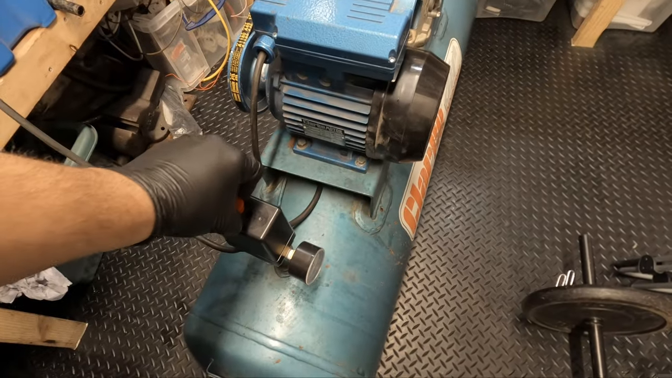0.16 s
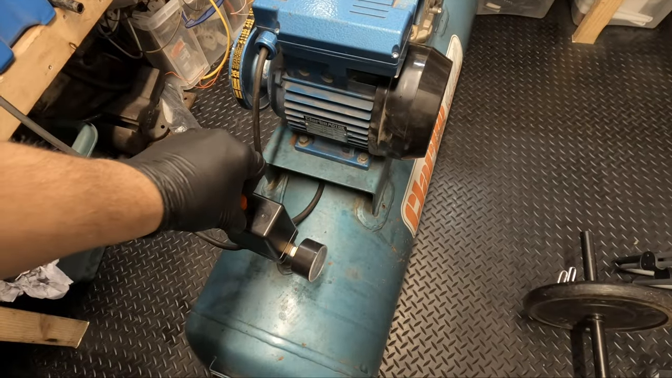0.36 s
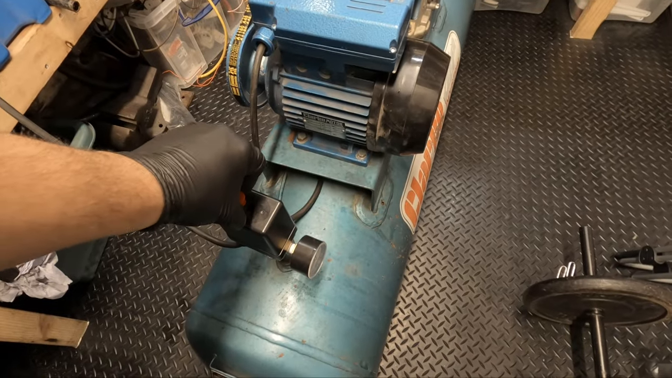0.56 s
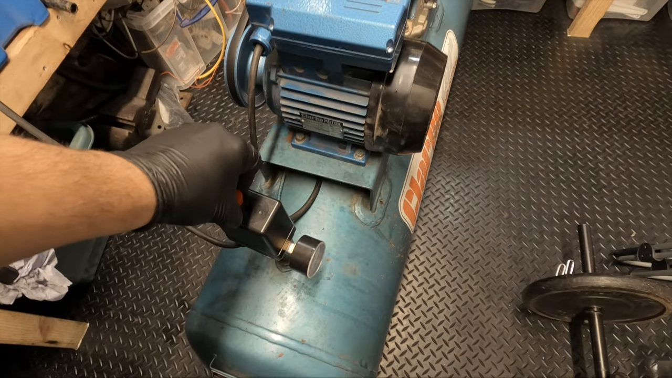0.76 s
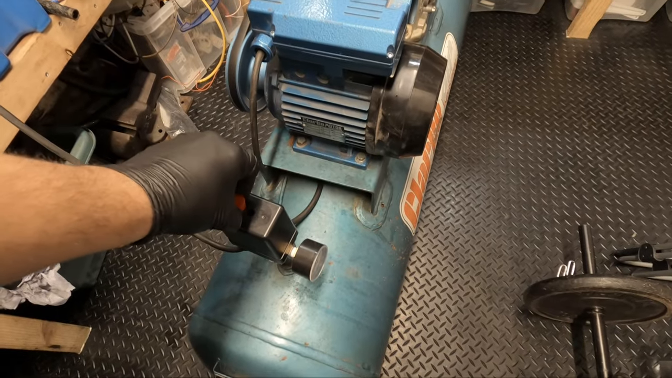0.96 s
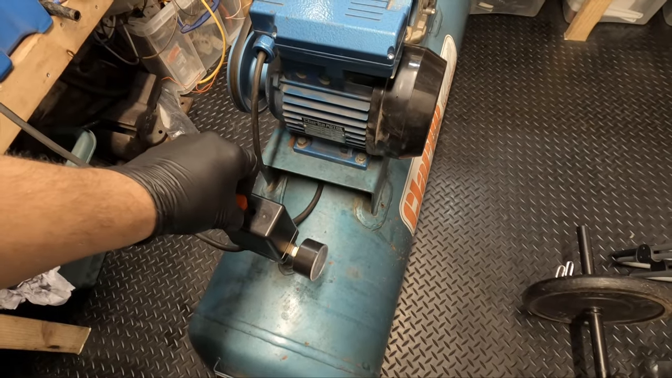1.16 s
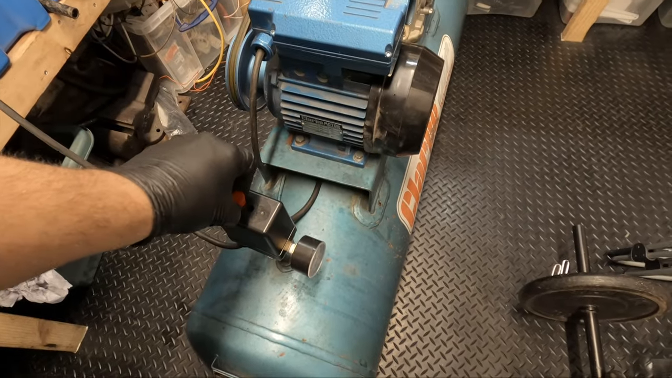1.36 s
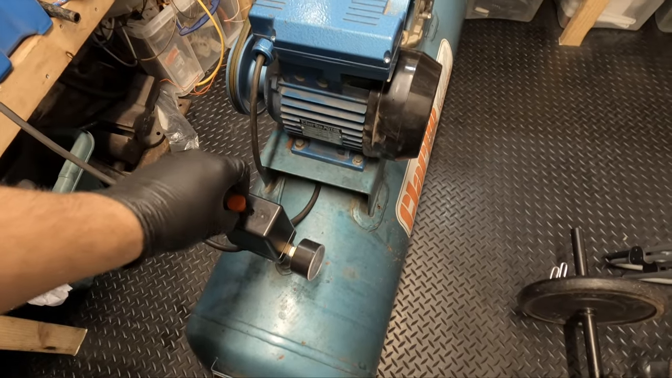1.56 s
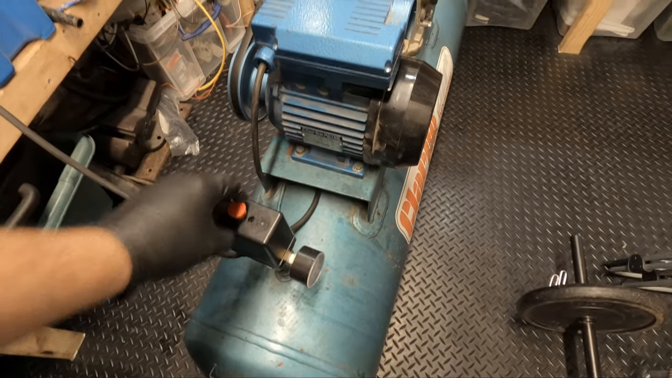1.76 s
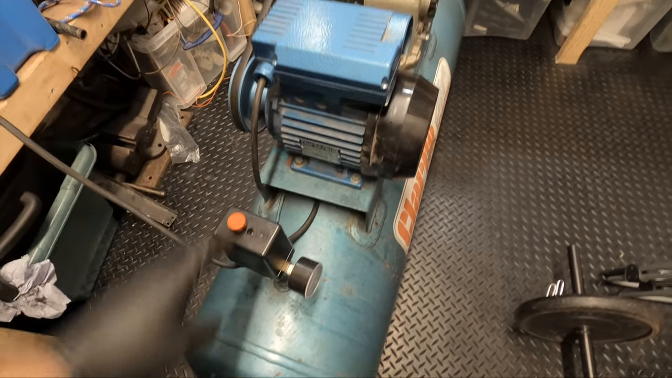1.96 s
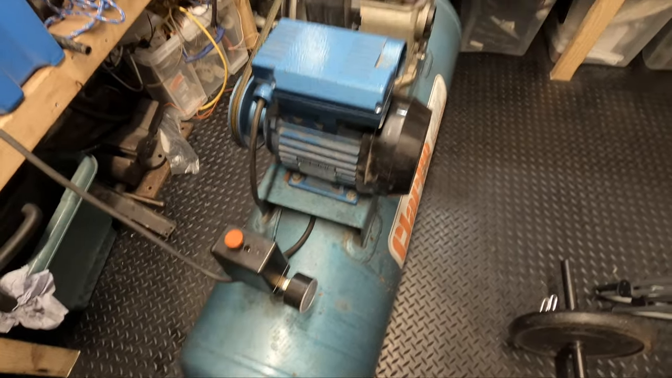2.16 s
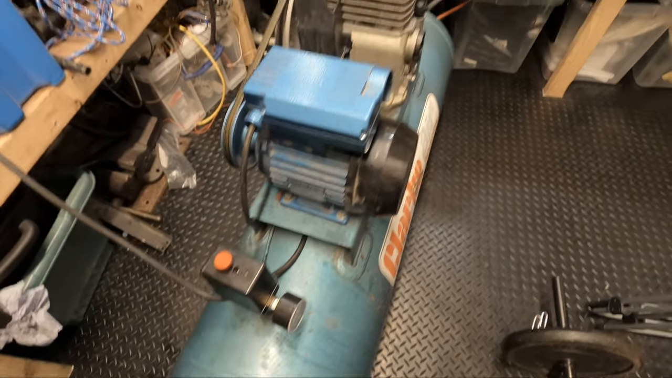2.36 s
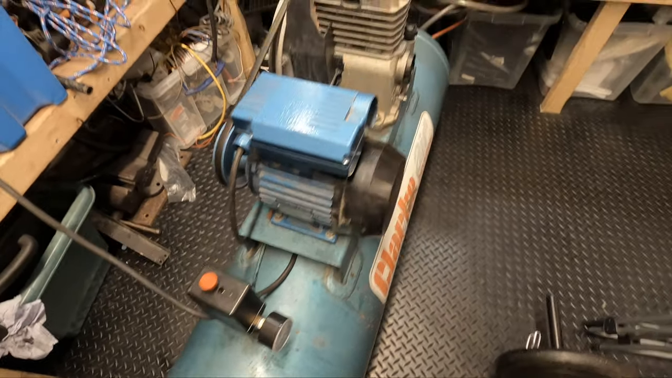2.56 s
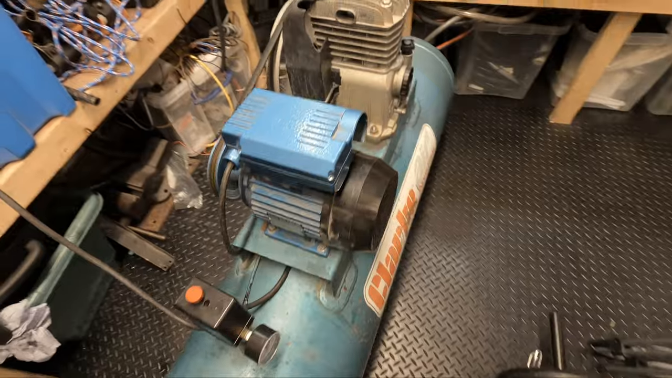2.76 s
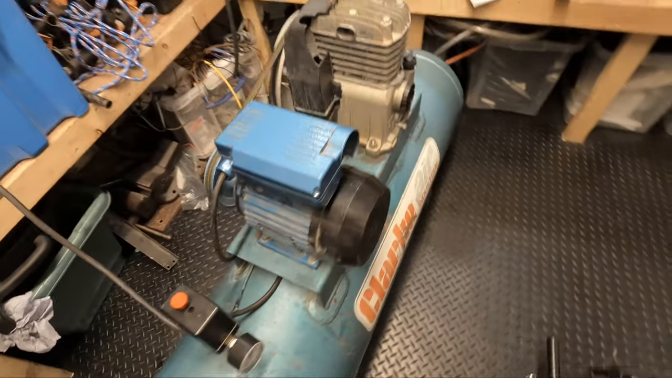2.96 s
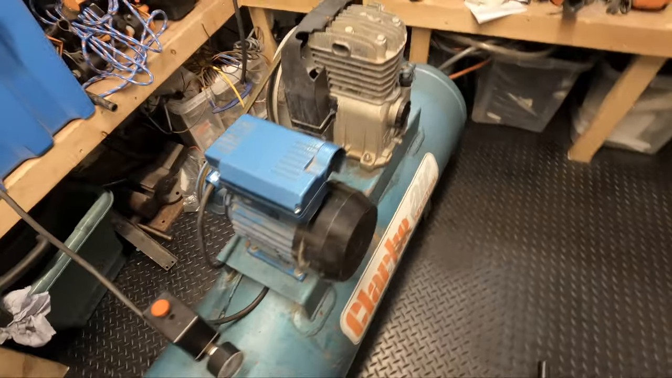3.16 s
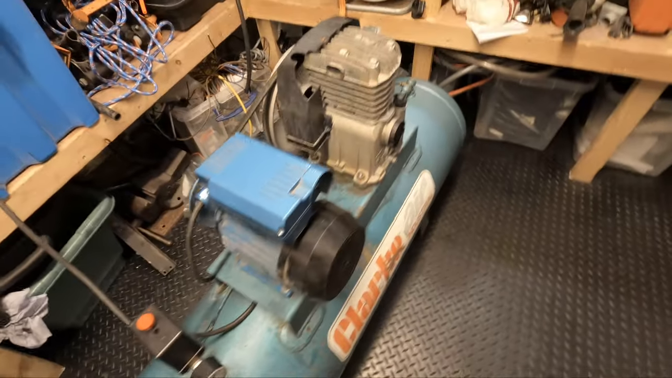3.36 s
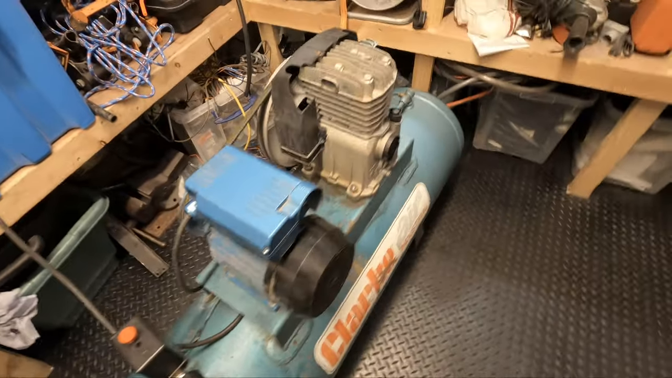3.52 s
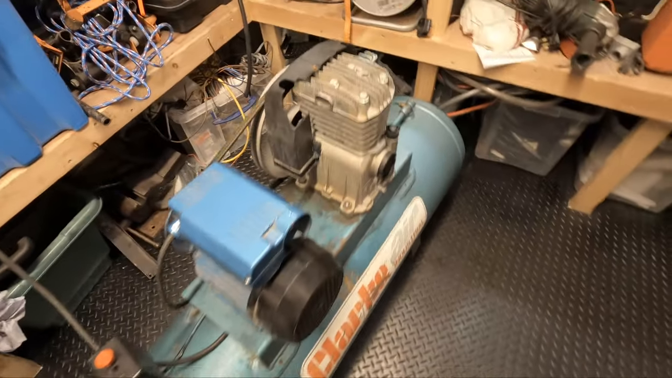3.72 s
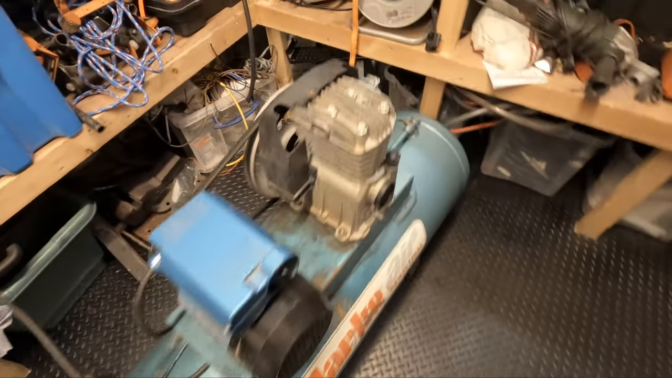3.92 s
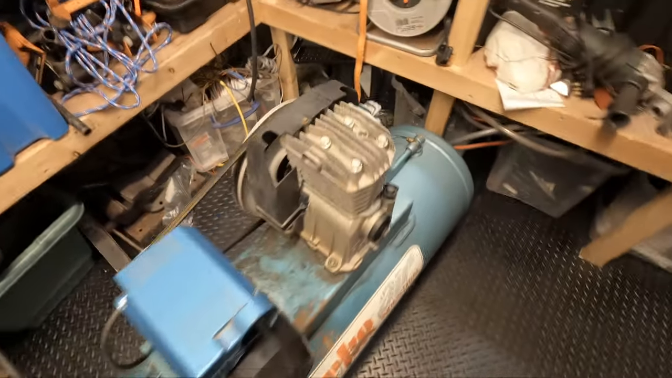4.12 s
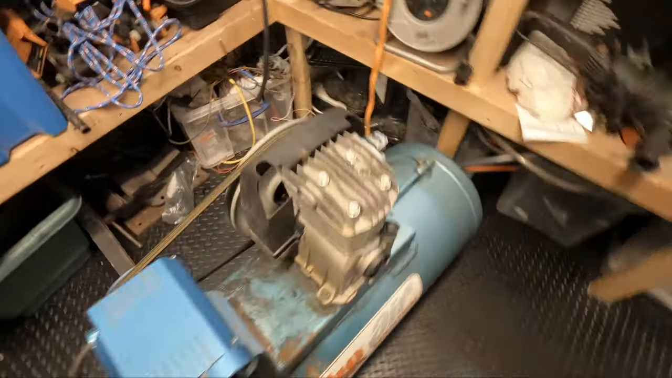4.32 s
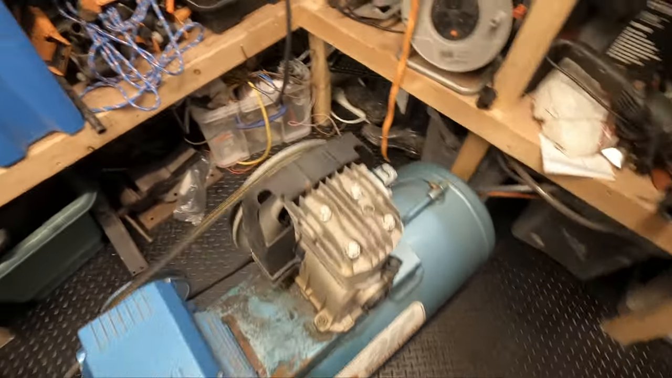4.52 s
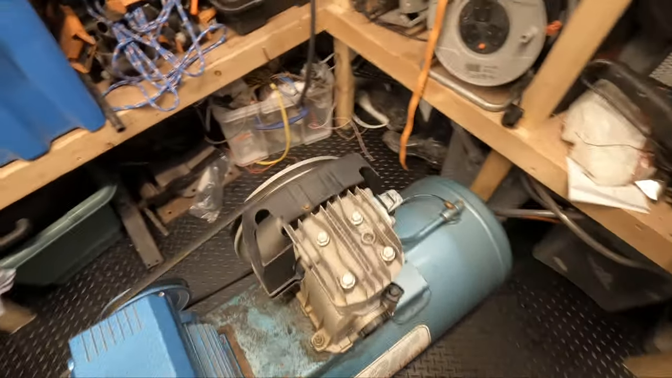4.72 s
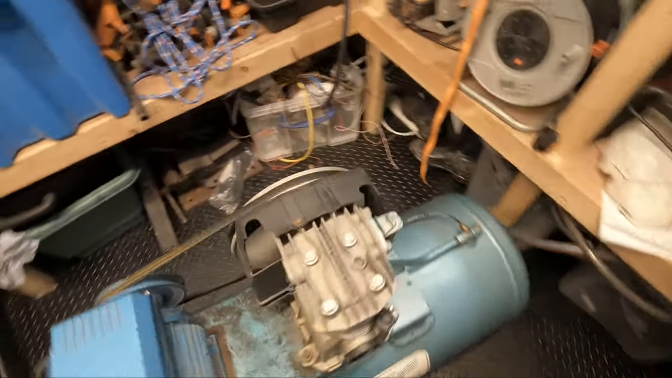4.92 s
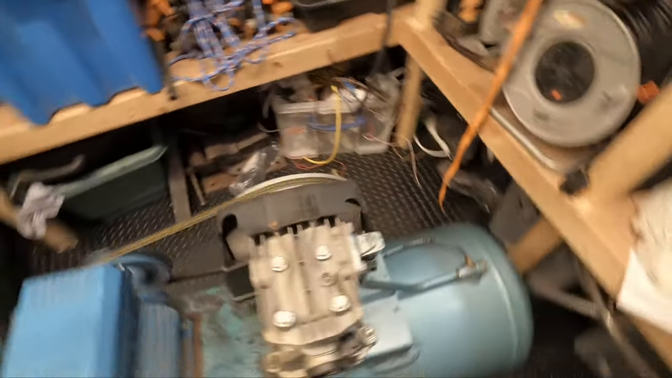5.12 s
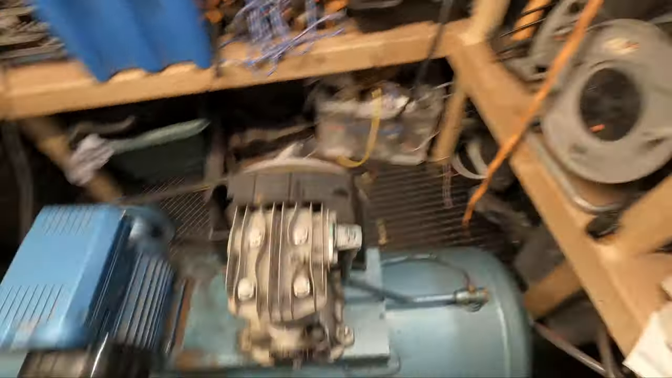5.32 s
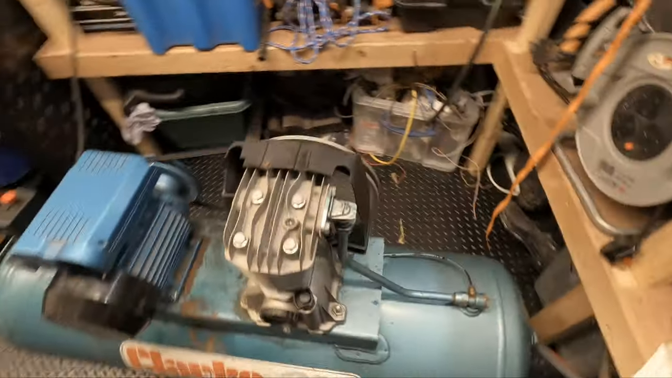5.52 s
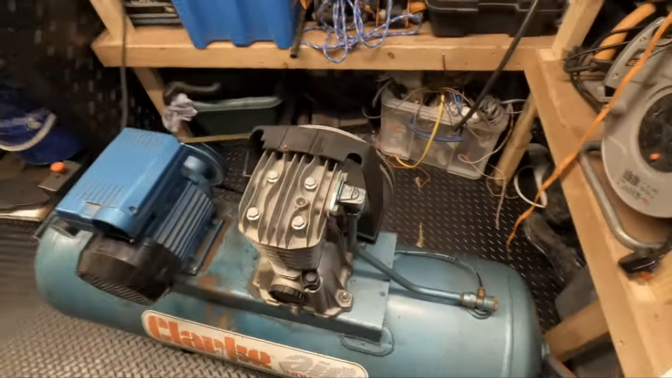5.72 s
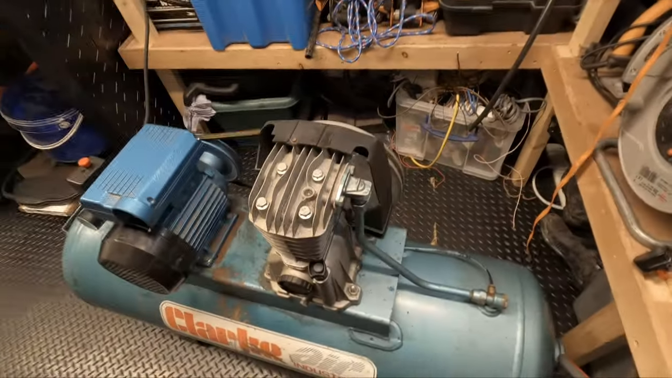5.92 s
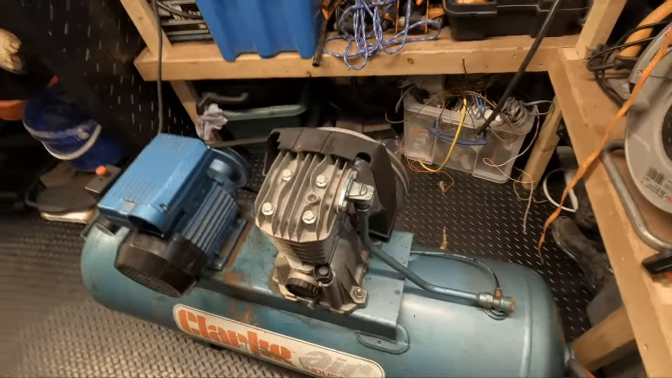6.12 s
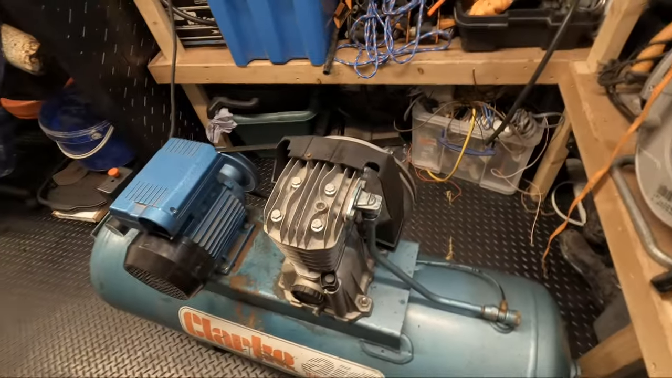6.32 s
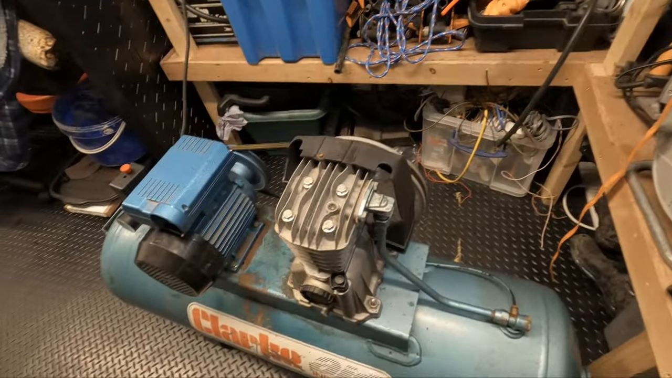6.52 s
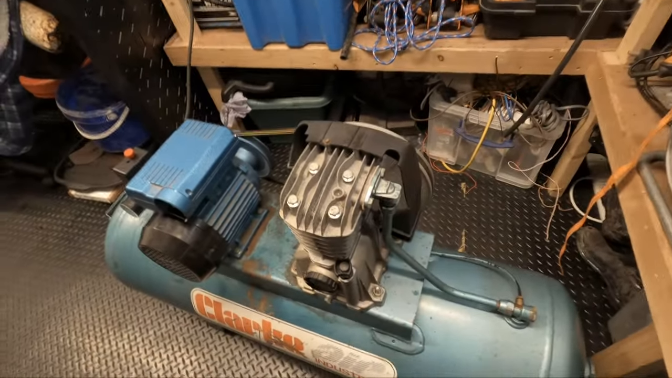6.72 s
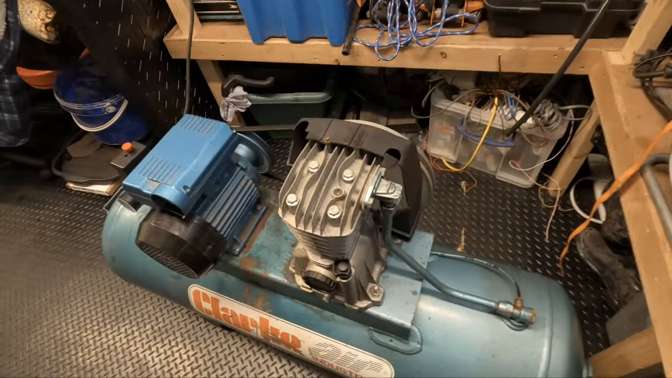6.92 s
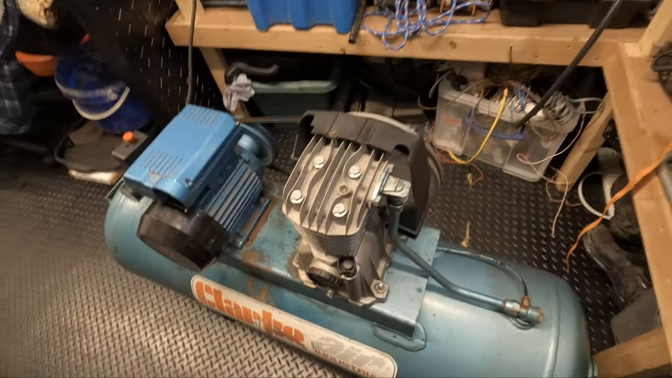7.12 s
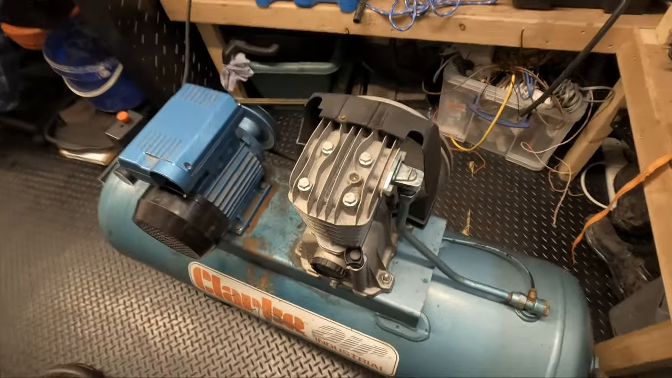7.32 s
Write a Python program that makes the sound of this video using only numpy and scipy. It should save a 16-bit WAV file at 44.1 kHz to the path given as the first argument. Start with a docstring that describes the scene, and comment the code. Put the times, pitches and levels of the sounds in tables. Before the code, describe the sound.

After faint fumbling, a hard click starts a belt-driven compressor; slow chugs quickly merge into a rapid throbbing rattle with metallic valve ticking.

```python
"""A hand fumbles faintly at a knob, a switch snaps, and a twin-cylinder air compressor starts in a garage.
Its first slow strokes sing as falling tones; then intake pulses settle near 48 a second under ticking reed
valves (filtered impulses and gated noise) and motor hum (wavering sines) with a noise rattle of the frame.
A hand-held camera walks around it, so colour changes; the stereo image opens from mono and later narrows again.
The flywheel's draught, gusts of low noise, buffets the microphone ports over a quiet room tone."""
import sys
import numpy as np
from scipy import signal
from scipy.fft import rfft, irfft, next_fast_len
from scipy.io import wavfile
from scipy.ndimage import uniform_filter1d, map_coordinates

SR = 44100
rng = np.random.default_rng(int(sys.argv[2]) if len(sys.argv) > 2 else 0)


def put_to_file(sound):
    """Save the sound as 16-bit audio at rate SR, in the file named by the first command-line argument."""
    columns = np.atleast_2d(sound).T  # one column per channel
    safe = np.clip(columns, -1, 1)
    whole_steps = np.round(safe * 32767)
    wavfile.write(sys.argv[1], SR, whole_steps.astype(np.int16))


N = 329868  # length in samples

# Crank: steady rate, number of the first stroke, strokes lost to belt slip, time constant of the slip
STROKE_HZ, FIRST_STROKE, SLIP_STROKES, SETTLE_S = 48.478, 44, .16, .45
SWITCH_ON_S, UP_TO_SPEED_S = .705, 1.34
# First strokes while the crank gathers speed: [time_s]
RUN_UP_S = [.6, .7723, .862, .9317, .9722, .9986, 1.025, 1.0481]

# Intake thump as heard from each standpoint: [multiple of stroke rate, relative_level_db]
BY_MOTOR = [(1, -12), (2, -5.5), (3, -6), (4, -18), (5, -16), (6, -2), (7, -13.5), (8, 6), (9, 3.5),
            (10, -4.5), (11, -4.5), (12, -12.5), (13, -12), (14, 4), (15, -4), (16, 5.5), (17, -0.5),
            (18, -10.5), (19, -19), (20, -29.5), (21, -43), (22, -11), (23, -17.5), (24, -21.5),
            (25, -50.5), (26, -27)]
BESIDE = [(1, -7), (2, -1), (3, -2), (4, -10), (5, -18), (6, -18), (7, -14), (8, 8), (9, 5.5), (10, 4),
          (11, 2.5), (12, -12), (13, -16), (14, 9.5), (15, 7), (16, 10.5), (17, -41.5), (18, -1.5),
          (19, -14.5), (20, -1), (21, -8.5), (22, -70.5), (23, -6.5), (24, -16.5), (25, -21), (26, -10)]
ABOVE = [(1, -12), (2, -6), (3, -6), (4, -17), (5, -25.5), (6, -2), (7, -4.5), (8, -0.5), (9, -2.5),
         (10, -5), (11, -20.5), (12, -19.5), (13, -81.5), (14, 5), (15, 5.5), (16, 4), (17, 0), (18, -17.5),
         (19, -7.5), (20, -12), (21, -26.5), (22, -12), (23, -55), (24, -20), (25, -14.5), (26, -13)]
BEHIND = [(1, -12.5), (2, -9.5), (3, -13), (4, -14.5), (5, -10.5), (6, -4.5), (7, -1), (8, 2), (9, -14),
          (10, -2), (11, -57.5), (12, -11), (13, -62.5), (14, 2), (15, 7.5), (16, 2.5), (17, -0.5),
          (18, -30), (19, -31.5), (20, -10), (21, -47.5), (22, -25), (23, -20.5), (24, -46), (25, -63),
          (26, -70)]
# Pulse shape at each standpoint: [abruptness 0-1, lateness_strokes, directness 0-1]
ONSET = [(0.76, 0.0096, 0.87), (0.88, 0.0052, 0.74), (0.6, 0.019, 0.92), (0.33, 0.057, 0.89)]
# Path of the camera: [time_s, standpoint number]
WALK = [(2.0, 0), (3.1, 1), (3.6, 1), (4.4, 2), (5.0, 2), (5.7, 3), (7.48, 3)]
# Thump level before the later level changes, extra at the start, and time constant of that extra
THUMP_DB, SURGE_DB, SURGE_S = -28.5, 3.5, 0.1

# Slow first strokes, the cylinder's air column sinking in pitch:
# [start_s, length_s, from_hz, toward_hz, level_db, overtone_db, valve_puff_db]
GULPS = [(0.735, 0.05, 230, 205, -32.5, -11.5, -28), (0.76, 0.097, 344.5, 283, -25, -3.5, -16),
         (.853, 0.087, 448, 238.6, -23, -1.5, 5.5), (0.922, 0.054, 453, 264, -22.5, -3, -10)]

# Broad sound of the pump head: [pitch_hz, relative_level_db]
HEAD = [(590, -37), (1000, -3.5), (1270, -5), (1410, -4), (2360, -15), (3960, -14), (5280, -18),
        (5920, -17.5), (7120, -29.5), (9370, -34.5), (10300, -44.5), (14200, -46.5), (15500, -58)]
# Ringing plates of the pump head: [pitch_hz, width_hz, relative_level_db]
PLATES = [(1890, 100, -8), (3097, 88, -11), (3908, 390, -7.5), (5838, 460, -4.5), (6580, 80, -13)]
# Valve ticks in one turn of the crank: [place_strokes, knock_db, plate_db, reed_db]
TICKS = [(.02, -4, -5, -6), (.3, -8, -8, -8), (.55, -9, -8, -9), (.85, -3, -9, -13), (.97, -6, 0, 2),
         (1.05, -8, -7, -1), (1.32, -9, -8, -8), (1.58, -10, -8, -9), (1.83, 0, -9, -10),
         (1.94, -1, -2, -4)]
# Lower edges of the five pump head registers (knock, plate, reed, hiss, top): [pitch_hz]
EDGES_HZ = [1150, 2550, 5000, 7250, 11000]
# Level of each register: [running_db, change_while_slow_db, switch_on_rush_db, slow_stroke_puff_db]
REGISTERS = [(-50.5, 0, -28, -63), (-44.5, -3, -25, -49), (-50, -6, -53, -54), (-58.5, 1.5, -36, -63),
             (-72.5, 3, -68, -83)]
# Bouncing after each tick, by register: [strength relative to the tick]
BOUNCE = [1.2, 1.0, .45, .6, .6]
# Broad head sound within the ticks, by register: [level_db]
TICK_HEAD_DB = [-4, -7.5, -13, -2, -6]
RUSH_T60_S, PUFF_T60_S = 0.16, 0.38

# Motor windings: [pitch_hz, relative_level_db]
HUM = [(100, -61.5), (199.4, -50.5), (300, -51), (414, -58)]
# Rattle of tank and frame: [pitch_hz, relative_level_db]
RATTLE = [(15, -21.5), (30, -14.5), (150, -8), (200, -5.5), (300, -2), (420, -6), (580, -7.5), (730, -2.5),
          (900, -2.5), (1300, -26), (1800, -53.5)]

# Ringing of the switch: [pitch_hz, relative_level_db, t60_s]
SWITCH = [(1090, -17.5, 0.39), (1281, -19.5, 0.26), (1910, -10.5, 0.09), (2700, -13.5, 0.18),
          (3700, -5.5, 0.067), (4300, -28.5, 0.08), (5200, -32, 1)]
# Small hard contacts (the knob, the switch, and a separate late tap):
# [start_s, level_db, pitch_hz, relative_rattle_db]
TOUCHES = [(0.132, -67, 1460, -11), (0.194, -80, 1890, -5), (0.228, -63, 4660, -13),
           (0.276, -67, 1970, -14), (0.379, -60.5, 2310, -7.5), (0.7014, -13.5, 4030, -28),
           (6.616, -36, 1060, -6)]
# Colour of the switch housing: [pitch_hz, gain_db]
HOUSING = [(200, -9), (1000, 4.5), (2200, 5), (5000, -2.5), (8000, -4.5), (11000, -29), (15000, -37)]

# Level changes (camera lifted clear of the hand; carried over the pump head; treble dulls abruptly, then
# returns): [start_s, end_s, then change_db of thump, knock, plate, reed, hiss, top]
LEVEL_CHANGES = [(1.4, 2.147, -0.4, 8, 1, 0.3, 2.5, -0.3), (2.6, 4.494, 0.46, -4, -2.5, 5, -1, 3.5),
                 (4.985, 5.134, -1.16, -1.2, -3.5, -6.5, -5, -20), (5.404, 6.1, 1.45, 0, 1, -0.4, 3, 13)]
# Stereo width, scaled separately for shifted copy, echo and gusts: [time_s, relative_width_db]
WIDTH = [(.7, -36), (1.05, -10), (1.6, -2), (2.3, -1), (3.3, -0.3), (5.05, .1), (5.35, -5), (5.9, -24.5),
         (6.3, -58)]
# Difference between the two channels by pitch: [pitch_hz, relative_side_db]
SIDES = [(60, -51), (130, -46), (290, -31.5), (640, -26.5), (1410, -21.5), (3100, -19), (6820, -13),
         (15000, -6)]
# Side levels at 0 dB width; how many dB shifted copy and gusts change for each dB of width
SHIFTED_DB, ECHO_DB, SHIFTED_GROWS, GUST_GROWS = 11.5, 9.5, 5.7, 1.2

# Gusts on the ports: [start_s, hold_s, level_db, relative_flap_db]
GUSTS = [(4.762, .06, -36.5, -10), (4.864, 0.093, -35, -15), (4.981, 0.16, -34.5, -3),
         (5.17, 0.063, -32, -14), (5.243, 0.067, -39.5, -14), (5.364, 0.031, -39.5, -16),
         (5.452, 0.014, -33, -18), (5.87, 0.012, -49, -14), (6.057, 0.053, -49, -12),
         (7.082, 0.038, -37, -8), (7.363, 0.059, -37.5, -2), (7.433, .03, -52, 2)]
# Slow eddies of a gust: [pitch_hz, relative_level_db]
SLOW_EDDIES = [(15, -9), (40, 9), (90, 1), (200, -8.5), (400, -23), (1200, -69)]
# Faster eddies of a gust: [pitch_hz, relative_level_db]
FAST_EDDIES = [(60, -39), (150, 8), (600, 1), (900, -5), (2000, -62)]
GUST_RISE_S, GUST_FALL_S = .012, .035

# Room tone: [pitch_hz, relative_level_db]
QUIET = [(15, -14), (25, -3.5), (178, 9), (583, -12.5), (1380, -11), (1760, -4), (3010, -16.5),
         (4880, -8.5), (15500, -42)]
TOP_HZ = 15690  # band limit of the camera


def thump():
    """One pressure pulse per intake stroke, the two cylinders slightly unlike, heard from a moving standpoint."""
    strokes = np.arange(48, 363)
    chance = rng.standard_normal((len(strokes), 2))
    place, = curves(WALK)
    heard = []
    for orders, (abrupt, late, direct) in zip([BY_MOTOR, BESIDE, ABOVE, BEHIND], ONSET):
        places = strokes - .17 + late + .001 * chance[:, 0]
        sizes = amp(.5 * (-1) ** strokes + 0.044 * chance[:, 1])
        points = [(5, -60)] + [(n * STROKE_HZ, db) for n, db in orders] + [(1600, -70)]
        colour = filtered(pulses(places, sizes), lambda hz: amp(along(points, hz)), causal=abrupt)
        heard.append(unit(rebound(colour, direct, delay=.0085)))
    heard = np.array(heard)
    share = np.clip(1 - abs(place - np.arange(len(heard))[:, None]), 0, 1)
    # Walking between standpoints keeps the loudness
    power = np.sum(share * (heard @ heard.T / N @ share), axis=0)
    steady = np.arange(N) > .955 * SR
    return np.sum(share * heard, axis=0) / np.sqrt(power) * steady


def gulps():
    """While the crank is slow, each stroke sings and falls in pitch as the cylinder opens."""
    out = np.zeros(N)
    for start_s, length_s, from_hz, toward_hz, db, over_db, _ in GULPS:
        u = np.arange(round(0.93 * length_s * SR)) / (length_s * SR)
        pitch_hz = toward_hz + (from_hz - toward_hz) * np.exp(-2.2 * u)
        phase = 2 * np.pi * np.cumsum(pitch_hz) / SR
        shape = (1 - np.exp(-u / 0.02)) * np.exp(-u ** 4)
        # The reed flaps against its stop 33 times a second
        flutter = amp(3 * np.sin(2 * np.pi * 33 * u * length_s))
        overtone = amp(over_db) * flutter * np.exp(-.6 * u) * np.sin(2.08 * phase)
        out[round(start_s * SR):][:len(u)] += amp(db) * shape * (np.sin(phase) + overtone)
    return out * amp(0.86 * wobble(89.6))  # an unsteady, rasping song


def valves(gate):
    """Reed ticks and escaping air ring the pump head's plates; each register has its own path to the camera."""
    place, *sizes_db = np.transpose(TICKS)
    strokes = (np.arange(44, 362, 2)[:, None] + place).ravel()  # two strokes to a turn
    standpoint, = curves(WALK)
    # The bounces sound otherwise as the camera moves
    path = 1.2 * standpoint + .5 * np.arange(N) / SR
    edges = EDGES_HZ + [SR]
    # Part of each register's power that is ticks; the rest is air
    shares = [.7, .55, .4 + .15 * np.minimum(standpoint, 2), .08, .04]
    out = 0
    for k, gain in enumerate(register_gains()):
        def band(hz):
            above = 1 + (edges[k] / (hz + 1)) ** 12
            below = 1 + (hz / edges[k + 1]) ** 12
            return 1 / np.sqrt(above * below)

        chance = rng.standard_normal((len(strokes), 2))
        sizes = amp(np.resize(sizes_db[min(k, 2)], len(strokes)) + chance[:, 1])
        ticks = unit(pulses(strokes + .0008 * chance[:, 0], sizes))
        # Each reed chatters on its seat
        bounces = np.cos(path) * echo(ticks, t60=.04) + np.sin(path) * echo(ticks, t60=.04)
        ticks = unit(ticks + BOUNCE[k] * bounces)
        air = unit(gate * rng.standard_normal(N))
        # Blows favour the plates, air the broad head sound
        ticks = unit(filtered(ticks, lambda hz: band(hz) * head_ring(hz, TICK_HEAD_DB[k]), causal=0.75))
        air = unit(filtered(air, lambda hz: band(hz) * head_ring(hz, 7.5)))
        out = out + gain * (np.sqrt(shares[k]) * ticks + np.sqrt(1 - shares[k]) * air)
    return out


def head_ring(hz, head_db):
    """Response of the pump head: its broad sound and the resonances of its plates add in power."""
    broad = amp(along(HEAD, hz) + head_db) ** 2
    plates = sum(amp(db) ** 2 / (1 + (2 * (hz - plate_hz) / width_hz) ** 2) ** 2
                 for plate_hz, width_hz, db in PLATES)
    return np.sqrt(broad + plates)


def register_gains():
    """Each register changes as the crank gains speed, and hisses at switch-on and with every slow stroke."""
    t = np.arange(N) / SR

    def dying(start_s, t60):
        return (t > start_s) * amp(-60 * np.maximum(t - start_s, 0) / t60)

    puffs = sum(amp(row[-1]) * dying(row[0], PUFF_T60_S) for row in GULPS)
    slow = 1 - ramp(RUN_UP_S[1], UP_TO_SPEED_S)
    gains = []
    for (db, slow_db, rush_db, puff_db), change_db in zip(REGISTERS, changed_db()[1:]):
        running = amp(db + slow_db * slow + change_db)
        rush = amp(rush_db) * dying(SWITCH_ON_S, RUSH_T60_S)
        gains.append(np.sqrt(running ** 2 + rush ** 2 + (amp(puff_db) * puffs) ** 2))
    return gains


def motor(gate):
    """Mains hum, wavering in level and phase, over the noise rattle of tank and frame."""
    t = np.arange(N) / SR
    hum = 0
    for hz, db in HUM:
        level = amp(db + 4.5 + 1.4 * wobble(8.5))
        hum = hum + level * np.sin(2 * np.pi * hz * t + 0.68 * wobble(7.4))
    rattle = unit(filtered(gate * rng.standard_normal(N), lambda hz: amp(along(RATTLE, hz))))
    return hum + amp(-41.0 + 2.3 * wobble(6.1)) * rattle


def contacts():
    """A gloved hand works the knob until the switch snaps; a separate tap comes late. Each is a ringing click."""
    out, t = np.zeros(N), np.arange(SR // 4) / SR
    for start_s, db, hz, rattle_db in TOUCHES:
        ring = sum(amp(level + rng.normal(0, 0.7) - 60 * t / t60) * np.sin(2 * np.pi * f * t)
                   for f, level, t60 in SWITCH)
        tick = amp(-60 * t / 0.0098) * np.sin(2 * np.pi * hz * t)
        crack = 1.27 * amp(-60 * t / 0.0085) * rng.standard_normal(len(t))
        # A loose buzz around 1.1 times the tick's pitch
        slow_noise = unit(uniform_filter1d(rng.standard_normal(len(t)), size=14))
        shake = slow_noise * np.sin(2.2 * np.pi * hz * t)
        rattle = amp(rattle_db + 3 - 60 * t / .14) * shake
        attack = 1 - np.exp(-t / 0.00019)
        contact = tick + crack + rattle + amp(-14.5) * ring
        out[round(start_s * SR):][:len(t)] += amp(db) * attack * contact
    return filtered(out, lambda hz: amp(along(HOUSING, hz)), causal=1)


def draught():
    """Air from the flywheel vanes tumbles over the ports in gusts, partly shared, partly each port's own."""
    t = np.arange(N) / SR
    width_db, = curves(WIDTH)
    slow, fast = (unit(filtered(rng.standard_normal((3, N)), lambda hz: amp(along(colour, hz))))
                  for colour in (SLOW_EDDIES, FAST_EDDIES))
    air = 0
    for start_s, hold_s, db, flap_db in GUSTS:
        fall = np.exp(-np.maximum(t - start_s - hold_s, 0) / GUST_FALL_S)
        shape = ramp(start_s, start_s + GUST_RISE_S) * fall
        air = air + amp(db) * shape * (slow + amp(flap_db) * fast)
    own = 1.5 * amp(GUST_GROWS * width_db) * air[1:]
    return amp(1.5 * wobble(40)) * (air[0] + own)


def room_tone():
    """The quiet of the place: steady noise, the same in both channels."""
    return amp(-83.5) * unit(filtered(rng.standard_normal(N), lambda hz: amp(along(QUIET, hz))))


def widen(x):
    """Two channels: a quarter-cycle-shifted copy and diffuse echo set the stereo width, which varies over time."""
    width_db, = curves(WIDTH)
    shifted_db, echo_db = SHIFTED_DB + SHIFTED_GROWS * width_db, ECHO_DB + width_db
    turn = np.pi * (0.55 * np.arange(N) / SR + 0.1 * wobble(1.2))
    wet = np.cos(turn) * echo(x, t60=0.11) + np.sin(turn) * echo(x, t60=0.34)
    shifted = filtered(x, lambda hz: -1j * amp(along(SIDES, hz)) / (1 + (hz / 4000) ** 2))
    wet = filtered(wet, lambda hz: amp(along(SIDES, hz)) / (1 + (1500 / (hz + 1)) ** 2))
    side = amp(shifted_db) * shifted + amp(echo_db) * wet
    return np.array([x + side, x - side])


def changed_db():
    """Level changes of the thump and of each register, each ramped in and then kept."""
    return sum(np.outer(change, ramp(from_s, to_s)) for from_s, to_s, *change in LEVEL_CHANGES)


def crank():
    """Times and strokes done: the slow first strokes, then a steady rate less a little belt slip."""
    u = np.arange(1, 700) / 100
    done = len(RUN_UP_S) - 1 + STROKE_HZ * u - SLIP_STROKES * (1 - np.exp(-u / SETTLE_S))
    times = np.r_[RUN_UP_S, RUN_UP_S[-1] + u]
    return times, FIRST_STROKE + np.r_[np.arange(len(RUN_UP_S)), done]


def pulses(strokes, sizes):
    """Impulses at the given crank positions, placed between samples by a windowed sinc."""
    s, count = crank()
    at = np.interp(strokes, count, s) * SR
    k = np.floor(at)[:, None] + np.arange(-7, 9)
    away = k - at[:, None]
    shape = np.sinc(away) * np.cos(np.pi * away / 16) ** 2
    return np.bincount(k.astype(int).ravel(), (shape * sizes[:, None]).ravel(), N + SR)[:N]


def echo(x, t60):
    """x smeared as by walls and shelves: convolved with dying noise, at its own strength."""
    t = np.arange(SR // 4) / SR
    wet = signal.fftconvolve(x, rng.standard_normal(len(t)) * amp(-60 * t / t60))[:N]
    return wet * np.std(x) / np.std(wet)


def rebound(x, direct, delay):
    """Part of each pulse comes back from a hard surface: an all-pass, so only its spread in time changes."""
    def all_pass(hz):
        late = np.exp(-2j * np.pi * hz * delay)
        return (direct + late) / (1 + direct * late)

    return filtered(x, all_pass)


def filtered(x, gain, causal=0):
    """x coloured by a gain of frequency; causal 1 is minimum phase, 0 adds no phase of its own."""
    m = 2 * next_fast_len(N // 2 + SR)
    g = gain(np.fft.rfftfreq(m, 1 / SR))
    if causal:
        # Folding the cepstrum gives the minimum phase
        cep = irfft(np.log(g + 1e-6), m)
        cep[1:m // 2] *= 2
        cep[m // 2 + 1:] = 0
        g = g * np.exp(1j * causal * rfft(cep).imag)
    return irfft(rfft(x, m) * g, m)[..., :N]


def wobble(rate):
    """A smooth random curve, rate knots a second."""
    return map_coordinates(rng.standard_normal(int(N * rate / SR) + 4), [np.arange(N) * rate / SR])


def ramp(from_s, to_s):
    """0 before, 1 after, straight between."""
    return np.clip((np.arange(N) / SR - from_s) / (to_s - from_s), 0, 1)


def curves(rows):
    """One value per sample for each column after the time."""
    s, *cols = np.transpose(rows)
    return [np.interp(np.arange(N) / SR, s, c) for c in cols]


def along(points, hz):
    """(pitch_hz, value) points read on a log pitch axis."""
    f, v = np.transpose(points)
    return np.interp(np.log(hz + 1), np.log(f + 1), v)


def amp(db):
    """Decibels to amplitude."""
    return 10 ** (np.asarray(db) / 20)


def unit(x):
    """x scaled to an RMS of 1."""
    return x / np.sqrt(np.mean(x ** 2) + 1e-20)


def scene():
    """Compressor and contacts are widened to two channels; draught and room tone are added."""
    t = np.arange(N) / SR
    surge_db = SURGE_DB * np.exp(-np.maximum(t - RUN_UP_S[4], 0) / SURGE_S)
    thump_db = THUMP_DB + surge_db + changed_db()[0]
    # Noise jumps up once a stroke, then falls 6 dB until the next
    gate = amp(-6 * ((np.interp(t, *crank()) - .9) % 1))
    running = ramp(SWITCH_ON_S, SWITCH_ON_S + 0.022)
    start = gulps()
    machine = amp(thump_db) * thump()
    machine = machine + start + amp(-3.5) * echo(start, t60=0.32)
    machine = machine + running * (valves(gate) + motor(gate))
    return widen(machine + contacts()) + draught() + room_tone()


def record(dry):
    """The camera keeps nothing above its band limit."""
    return filtered(dry, lambda hz: hz < TOP_HZ)


dry = scene()
out = record(dry)
put_to_file(out)
```